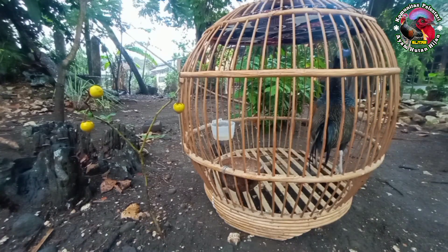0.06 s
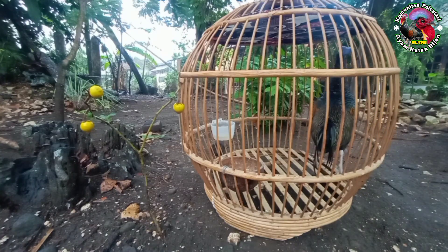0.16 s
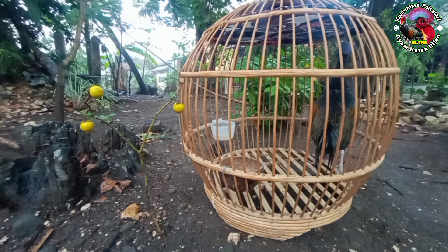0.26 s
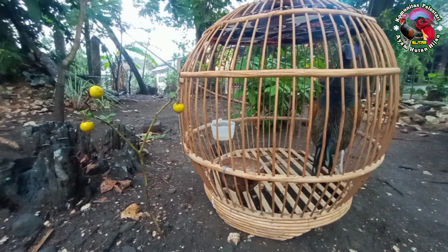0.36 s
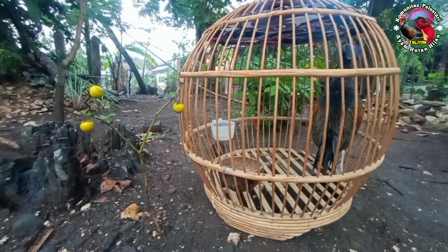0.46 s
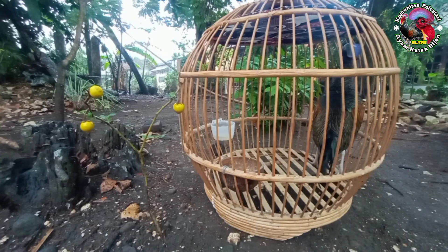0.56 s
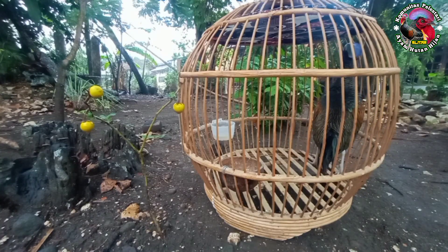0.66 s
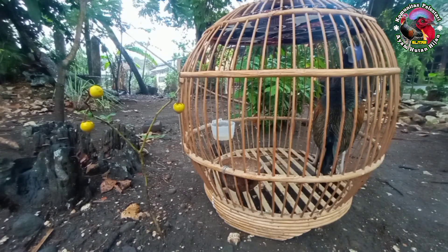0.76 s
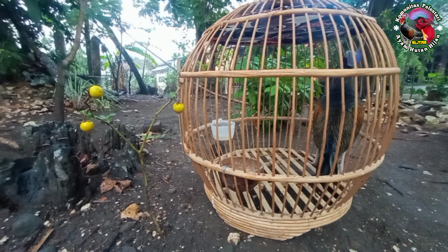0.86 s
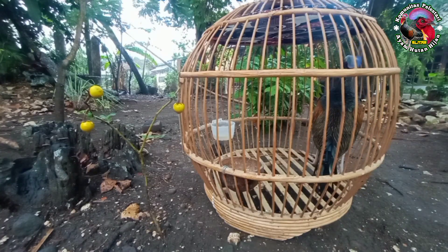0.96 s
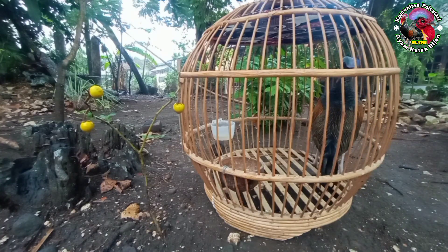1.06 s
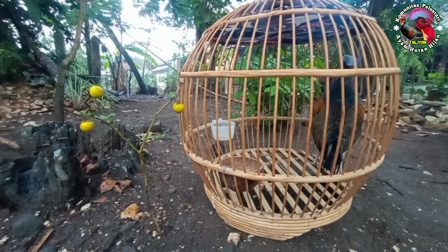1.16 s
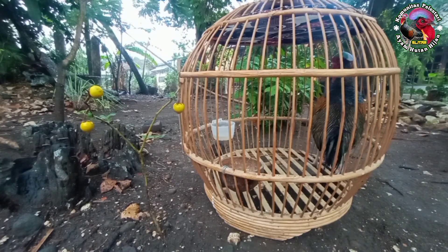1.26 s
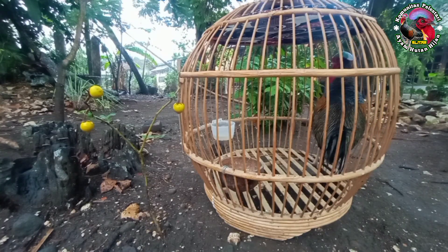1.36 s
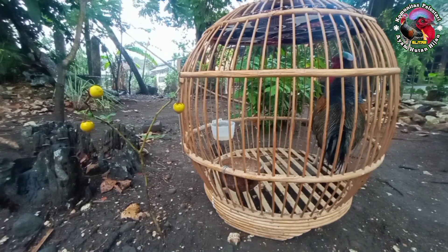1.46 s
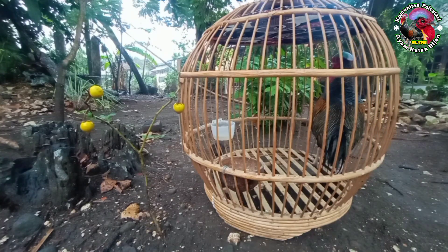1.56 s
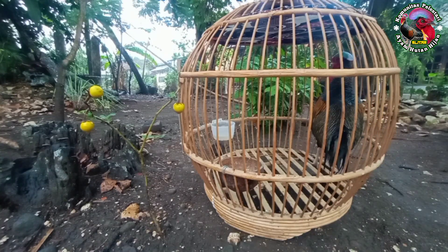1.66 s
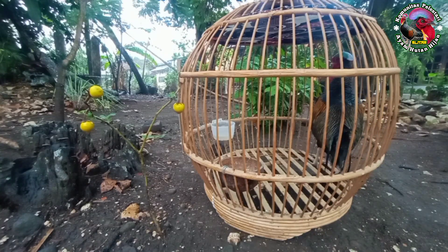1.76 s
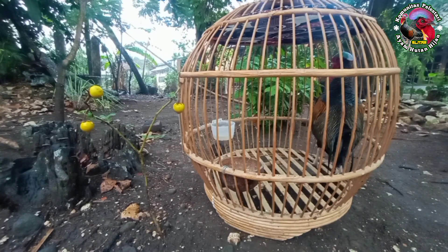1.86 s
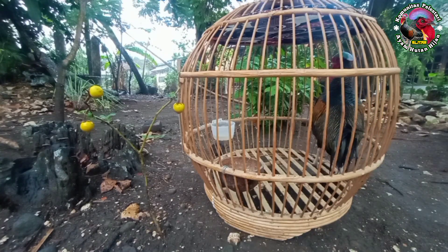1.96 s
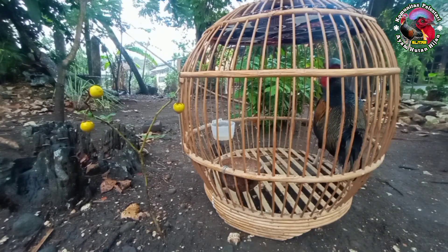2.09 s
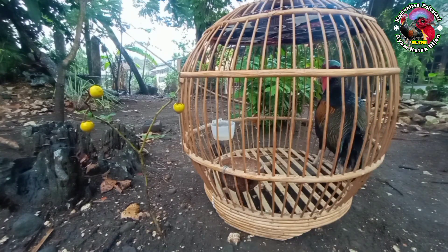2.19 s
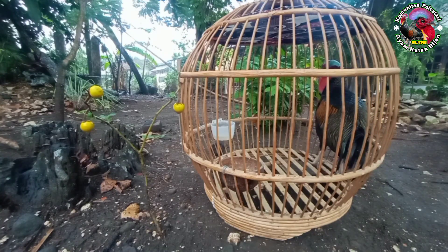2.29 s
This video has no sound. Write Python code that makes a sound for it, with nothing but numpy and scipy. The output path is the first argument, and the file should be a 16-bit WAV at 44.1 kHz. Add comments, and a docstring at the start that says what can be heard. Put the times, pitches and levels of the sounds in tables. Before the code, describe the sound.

One shrill crow from a wild rooster, breaking into a raspy trill, outdoors among trees.

```python
"""Junglefowl in a wooded yard

One microphone near a wicker cage. The bird crows once, its syrinx buzzing through its throat: a soft
cluck, a sharp yelp, two short low notes, then a rise that breaks into a high, harsh trill and falls.
Trees and walls answer with echoes; far off are a thin steady tone, small birds and a low rumble."""
import sys
import numpy as np
from scipy import signal
from scipy.fft import rfft, irfft
from scipy.io import wavfile
from scipy.ndimage import uniform_filter1d, minimum_filter1d

SR = 44100
rng = np.random.default_rng(int(sys.argv[2]) if len(sys.argv) > 2 else 0)


def generate_wav(sig):
    """Save sig (samples, or channels by samples) to the path in sys.argv[1] as 16-bit PCM at SR."""
    pcm = np.round(np.clip(np.atleast_2d(sig).T, -1, 1) * 32767).astype(np.int16)
    wavfile.write(sys.argv[1], SR, pcm)


N = 101430
TIME = np.arange(N) / SR


def from_db(db):
    """Decibels to gain."""
    return 10 ** (np.asarray(db) / 20)


def rms_one(x):
    """Scale to unit power."""
    return x / np.sqrt(np.mean(x ** 2) + 1e-20)


def in_time(rows):
    """Each column of a curve at every sample."""
    s, *columns = np.transpose(rows)
    return [np.interp(TIME, s, c) for c in columns]


def at_hz(points, hz, column=1):
    """Read a column of a spectrum on a log-frequency axis."""
    points = np.array(points)
    return np.interp(np.log(np.maximum(hz, 1)), np.log(points[:, 0]), points[:, column])


def cut(x, hz, kind, order):
    """Butterworth low-, high- or band-pass."""
    return signal.sosfilt(signal.butter(order, hz, kind, fs=SR, output="sos"), x)


def drift(rate_hz):
    """Smooth random wander of unit power."""
    r = np.exp(-2 * np.pi * rate_hz / SR)
    return rms_one(signal.lfilter([1], [1, -2 * r, r * r], rng.standard_normal(N + SR))[SR:])


def swirl(rate_hz):
    """Random wander of both strength and phase; unit power."""
    return (drift(rate_hz) + 1j * drift(rate_hz)) / np.sqrt(2)


def noise(spectrum, tilt_db=0):
    """Noise of a given colour, tilted per octave; unit power."""
    hz = np.maximum(np.arange(N // 2 + 1) * SR / N, 1)
    colour = from_db(at_hz(spectrum, hz) + tilt_db * np.log2(hz))
    return rms_one(irfft(rfft(rng.standard_normal(N)) * colour, N))


def sine(hz):
    """A pure tone following a pitch curve."""
    return np.sin(2 * np.pi * np.cumsum(hz) / SR)


def whistle(start_s, length_s, hz, db):
    """One whistled note that swells and fades."""
    along = np.clip((TIME - start_s) / length_s, 0, 1)
    return from_db(db) * np.sqrt(np.abs(np.sin(np.pi * along))) * sine(hz)


# Air all round the microphone: frequency_hz, relative_db
AIR_COLOUR = [(25, -21.5), (120, -2.5), (250, -6.5), (400, -10), (900, -12), (1230, -3.5), (1600, -21),
              (4200, -20.5), (7000, -33.5), (16000, -39)]
def still_air(level_db=-71):
    """The steady hush of the yard."""
    return from_db(level_db) * noise(AIR_COLOUR)


# Thin tone, far off: time_s, level_db
FAR_TONE_LEVEL = [(0, -73.5), (1.68, -78.5), (1.78, -68), (1.85, -85), (2.16, -75.5), (2.21, -63)]
def far_tone(pitch_hz=1258, waver_hz=16, flicker_db=3):
    """A faint pure tone that wavers in pitch and level."""
    hz = pitch_hz + waver_hz * drift(27)
    db = in_time(FAR_TONE_LEVEL)[0] + flicker_db * drift(12)
    return from_db(db) * np.sqrt(2) * sine(hz)


# Small birds, far from the microphone: start_s, length_s, start_hz, end_hz, level_db
TWITTERS = [(0.091, 0.13, 7750, 7700, -84), (1.952, .03, 5520, 5130, -79), (1.96, 0.069, 4390, 3580, -72),
            (2.077, 0.11, 4180, 4750, -77), (2.2, 0.056, 4350, 4600, -76.5)]
def twittering_birds(waver_hz=420):
    """Short, high whistles that glide unsteadily."""
    out = 0
    for start_s, length_s, start_hz, end_hz, db in TWITTERS:
        glide = np.interp(TIME, [start_s, start_s + length_s], [start_hz, end_hz])
        out = out + whistle(start_s, length_s, glide + waver_hz * drift(41), db)
    return out


# Trees around the yard: frequency_hz, gain_db, t60_s
GROVE = [(660, -25.5, .75), (1190, -10.5, .75), (2000, -18, 0.86), (3600, -13.5, 0.87), (7000, -4.5, 0.65),
         (14000, -5, .36)]
def trees(x, build_s=.004, reach_s=.5):
    """Diffuse scatter among the trees builds quickly and dies away band by band."""
    t, response = TIME[:SR], 0
    edges = np.geomspace(450, 17000, 11)
    for low, high in zip(edges, edges[1:]):
        hz = np.sqrt(low * high)
        t60_s = at_hz(GROVE, hz, column=2)
        fade = (1 - np.exp(-t / build_s)) * np.exp(-np.log(1000) * t / t60_s)
        fade = fade / (1 + (t / reach_s) ** 10)   # scatter ends where the grove does
        band = cut(rng.standard_normal(SR), [low, high], "band", order=2)
        response = response + from_db(at_hz(GROVE, hz)) * band * fade / np.sqrt(np.sum(fade ** 2))
    return signal.fftconvolve(x, response)[:N]


ATTACK_S, RELEASE_S, EDGE_DB = .0065, .009, -32   # a note starts and ends this far under its level
JITTER, JITTER_RATE_HZ = .03, 250   # pitch shake at full roughness
SHIMMER, SHIMMER_RATE_HZ = .84, 41   # level shake at full roughness
DOUBLING_DB, DOUBLING_RATE_HZ = 5, 82   # period doubling puts lines between the overtones
FRAY_HZ, FRAY_RATE_HZ = 9500, 170   # overtones this high flutter into noise
RASP_DB, RASP_TILT_DB = -14, 5
def syrinx(rows, throat, bend_hz=0, count=22):
    """One note: overtones sweep through the throat; roughness adds shake, doubling and puffs of air."""
    hz, db, rough = in_time(rows)
    before, after = (rows[0][0] - TIME) / ATTACK_S, (TIME - rows[-1][0]) / RELEASE_S
    edge = np.maximum(np.maximum(before, after), 0)
    on = edge < 1
    rough = np.clip(rough[on], 0, 1)
    hz = (hz + bend_hz)[on] * (1 + JITTER * rough * drift(JITTER_RATE_HZ)[on])
    phase = 2 * np.pi * np.cumsum(hz) / SR
    shimmer, doubling, flutter = drift(SHIMMER_RATE_HZ), swirl(DOUBLING_RATE_HZ), swirl(FRAY_RATE_HZ)
    tone, power = 0, 0
    for k in range(1, count):
        own = (np.flatnonzero(on) + k * N // count) % N   # each overtone wanders on its own
        gain, half_gain = (from_db(at_hz(throat, m * hz)) * (m * hz < SR / 2) for m in (k, k + .5))
        fray = np.minimum(k * hz / FRAY_HZ, 1) ** 4
        frayed = np.sqrt(1 - fray ** 2) + fray * flutter[own]
        overtone = gain * (1 + SHIMMER * rough * shimmer[own]) * frayed
        between = half_gain * from_db(DOUBLING_DB) * rough ** 1.5 * doubling[own]
        tone = tone + np.imag((overtone + between * np.exp(.5j * phase)) * np.exp(1j * k * phase))
        power = power + (np.abs(overtone) ** 2 + np.abs(between) ** 2) / 2
    tone = tone / np.sqrt(uniform_filter1d(power, size=1024))
    puffs = noise(throat, RASP_TILT_DB)[on] * (1 + np.cos(phase))
    out = np.zeros(N)
    out[on] = (tone + from_db(RASP_DB) * rough * puffs) * from_db(db + EDGE_DB * edge)[on]
    return out


# The crow from the cage, near the microphone: time_s, pitch_hz, level_db (before filters), roughness
SOFT_CLUCK = [(.179, 980, -35, .6), (.184, 910, -34.5, .5)]
SHARP_YELP = [(.224, 1500, -9.5, 0.44), (.233, 1340, -10, 0.84), (.252, 1270, -8, 0.37),
              (.256, 1190, -9.5, 0.5)]
YELP_DROP = [(.257, 930, -20.5, .4), (.279, 725, -28.5, .07), (.318, 690, -34.5, .2)]
FIRST_LOW_NOTE = [(.353, 670.4, -20, .25), (.368, 710, -21.5, .25), (.376, 842, -31.5, .3)]
SECOND_LOW_NOTE = [(.388, 864, -16.5, .4), (.404, 985, -14.5, 0.79), (.416, 891, -14.5, .05),
                   (.434, 932.5, -14.5, 0.038), (.455, 810, -19.5, .15), (.466, 891, -21.5, .2)]
RISING_NOTE = [(.555, 767.6, -18, 0.57), (.569, 837.4, -16, 0.026), (.637, 947.8, -13.5, 0.022),
               (.653, 1000, -14.5, 0.26), (.668, 976, -13.5, 0.27)]
HARSH_TRILL = [(.671, 1277, -9.5, 0.63), (.78, 1396, -10.5, .45), (.835, 1414, -13.5, 0.46),
               (.87, 1305, -9.5, 0.64), (.891, 1382, -12, .3), (.907, 1285, -6.5, 0.77),
               (.918, 1299, -10, .12), (.936, 1249, -7, .08), (.948, 1117, -18, .4)]
LAST_FALL = [(0.949, 980, -27, .6), (.978, 726, -28.5, 0.57)]
# Depth of the quaver on the rising note, and of the trill: time_s, swing_hz
QUAVER_DEPTH = [(.58, 4.5), (.61, 23), (.66, 34.5)]
TRILL_DEPTH = [(.665, 110), (.80, 175), (.835, 175), (.855, 85), (.925, 10)]
# Colour of the throat in its two registers: frequency_hz, relative_db
LOW_REGISTER = [(650, -10.5), (880, -2.5), (1700, -2.5), (2100, -14.5), (2800, 0.5), (3150, -8),
                (3600, -1.5), (4200, -16.5), (5500, -5.5), (6300, -25.5), (10500, -34), (12800, -51.5),
                (15200, -39.5)]
HIGH_REGISTER = [(880, -17.5), (1130, 3.5), (1270, 5), (1380, -8), (1520, -24.5), (2300, -22), (2750, -10),
                 (3130, -3), (3430, -14.5), (3950, -8), (4280, -19), (4600, -16), (5500, -16),
                 (6300, -27.5), (8200, -35.5), (10000, -35.5), (12800, -53), (15000, -45)]
QUAVER_RATE_HZ, QUAVER_CREST_S = 49, .629
TRILL_RATE_HZ, TRILL_CREST_S = 38.9, .795
HOLLOW_HZ, HOLLOW_Q = 1426, 6.5   # a narrow hollow above the throat's main resonance
def junglefowl():
    """One crow: the voice jumps from its low register to the high one for the yelp and the trill."""
    quaver = in_time(QUAVER_DEPTH)[0] * np.cos(2 * np.pi * QUAVER_RATE_HZ * (TIME - QUAVER_CREST_S))
    trill = in_time(TRILL_DEPTH)[0] * np.cos(2 * np.pi * TRILL_RATE_HZ * (TIME - TRILL_CREST_S))
    trill = trill * (1 + .15 * drift(60))   # no two swings are equally deep
    low = sum(syrinx(rows, LOW_REGISTER) for rows in (YELP_DROP, FIRST_LOW_NOTE, SECOND_LOW_NOTE))
    low = low + syrinx(RISING_NOTE, LOW_REGISTER, quaver)
    high = syrinx(SHARP_YELP, HIGH_REGISTER) + syrinx(HARSH_TRILL, HIGH_REGISTER, trill)
    high = cut(high, 860, "high", order=6)   # clears the range below this register's lowest pitch
    high = signal.lfilter(*signal.iirnotch(HOLLOW_HZ, HOLLOW_Q, fs=SR), high)
    soft = syrinx(SOFT_CLUCK, LOW_REGISTER) + syrinx(LAST_FALL, LOW_REGISTER)
    muffled = cut(soft, 1300, "low", order=3)   # the beak is closed
    return cut(low + high + muffled, 600, "high", order=6)


# Walls and trunks, heard from the microphone: delay_s, gain_db
REFLECTIONS = [(.055, -20), (.131, -29.5), (.163, -20)]
def echoes(x):
    """Walls and trunks send back a few dull, distinct reflections."""
    dull = cut(x, 1800, "low", order=2)
    return sum(from_db(db) * np.interp(TIME - s, TIME, dull, left=0) for s, db in REFLECTIONS)


# Rumble in the distance: peak_s, width_s, level_db
RUMBLE_SWELLS = [(1.241, 0.066, -64), (1.96, 0.096, -81)]
# Its colour from the yard: frequency_hz, relative_db
RUMBLE_COLOUR = [(50, -47), (240, -13), (450, -17.5), (4000, -41.5)]
def far_rumble():
    """Low noise rises and falls in two smooth swells."""
    swells = sum(from_db(db) * np.exp(-.5 * ((TIME - s) / width) ** 2) for s, width, db in RUMBLE_SWELLS)
    return swells * noise(RUMBLE_COLOUR)


# One bird's whistle, far off in the trees: elapsed_s, pitch_hz
WHISTLE_SHAPE = [(0, 3200), (.022, 4750), (.035, 3900), (.05, 3590), (.11, 3560)]
# Its repeats: start_s, level_db
WHISTLE_REPEATS = [(1.43, -77), (1.622, -76), (1.833, -75.5), (2.07, -78)]
def whistling_bird():
    """A small bird repeats a whistle that flicks up, drops and holds."""
    elapsed_s, hz = np.transpose(WHISTLE_SHAPE)
    return sum(whistle(s, elapsed_s[-1], np.interp(TIME - s, elapsed_s, hz), db)
               for s, db in WHISTLE_REPEATS)


def scene():
    """The near crow and its echoes over the quiet yard, in mono."""
    crow = junglefowl()
    crow = crow + echoes(crow) + trees(crow)
    far_birds = twittering_birds() + whistling_bird()
    far_birds = far_birds + from_db(11) * trees(far_birds)   # heard mostly through the trees
    return (crow + far_birds + still_air() + far_rumble() + far_tone())[None]


def record(dry, ceiling=.66, window_samples=400, cutoff_hz=15600):
    """After the microphone, a fast limiter holds the peaks down and the top is cut steeply."""
    gain = minimum_filter1d(ceiling / np.maximum(np.abs(dry), ceiling), window_samples)
    smooth_gain = uniform_filter1d(uniform_filter1d(gain, window_samples // 2), window_samples // 2)
    return signal.sosfilt(signal.ellip(12, .1, 80, cutoff_hz, fs=SR, output="sos"), dry * smooth_gain)


dry = scene()
out = record(dry)
generate_wav(out)
```